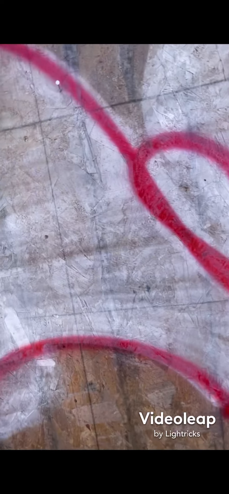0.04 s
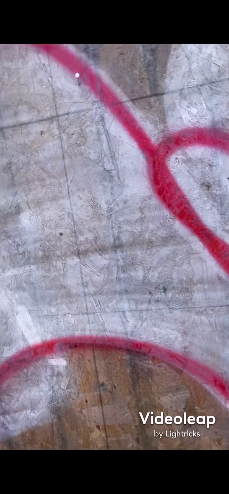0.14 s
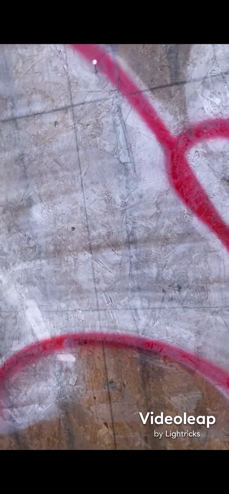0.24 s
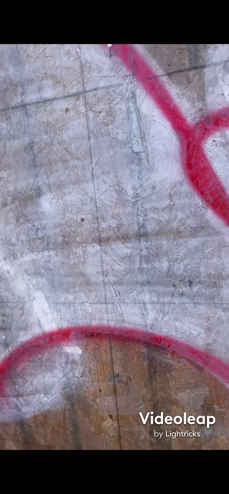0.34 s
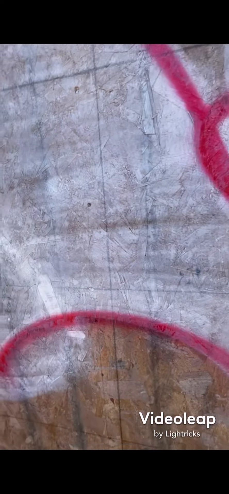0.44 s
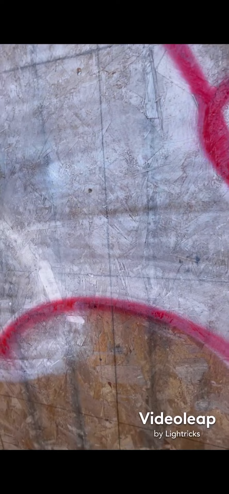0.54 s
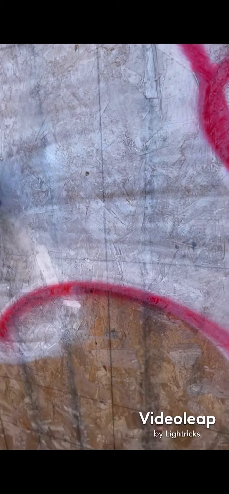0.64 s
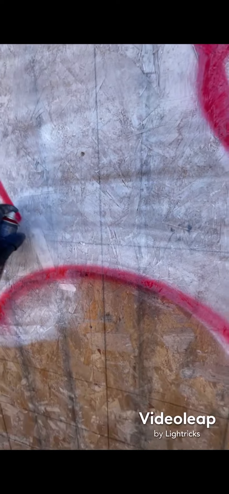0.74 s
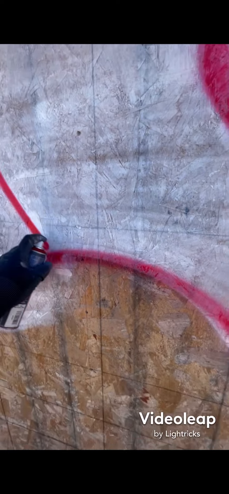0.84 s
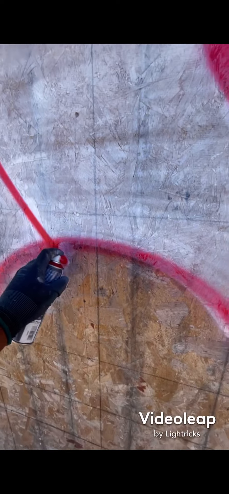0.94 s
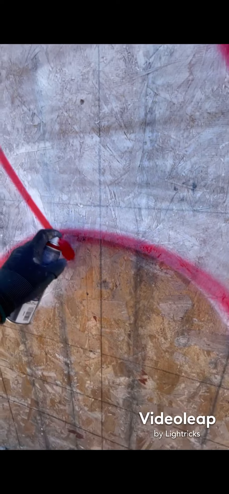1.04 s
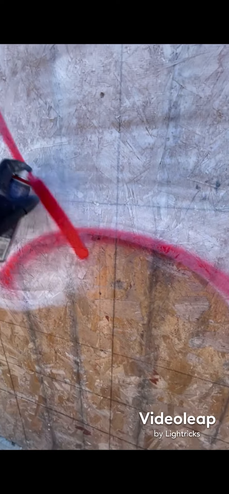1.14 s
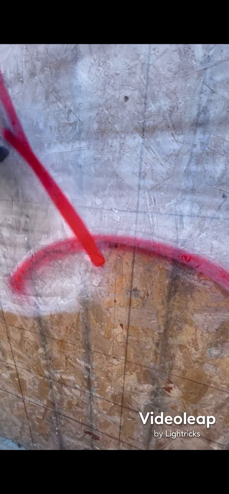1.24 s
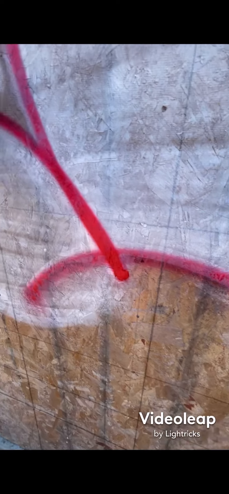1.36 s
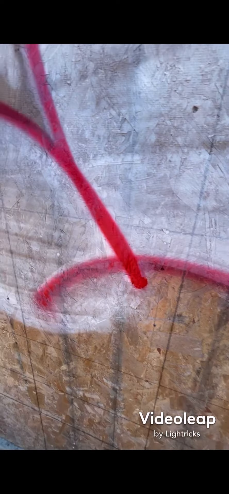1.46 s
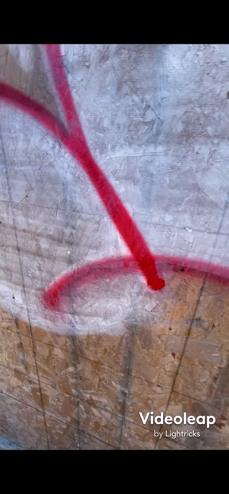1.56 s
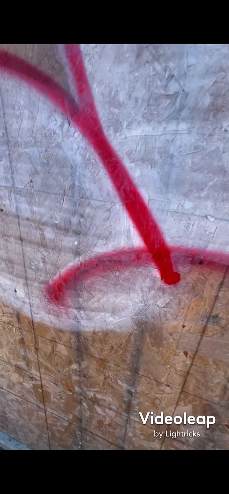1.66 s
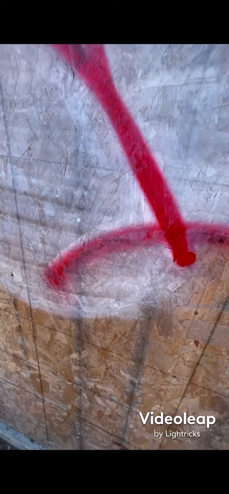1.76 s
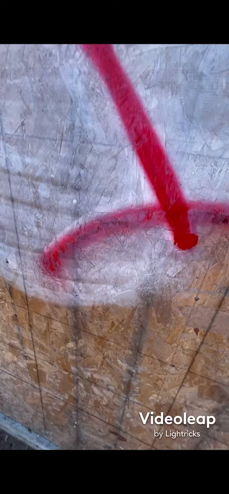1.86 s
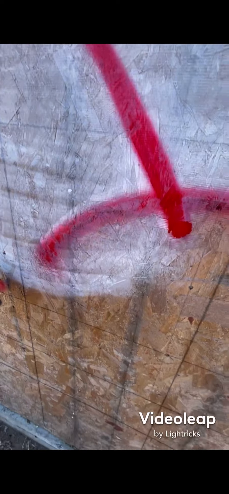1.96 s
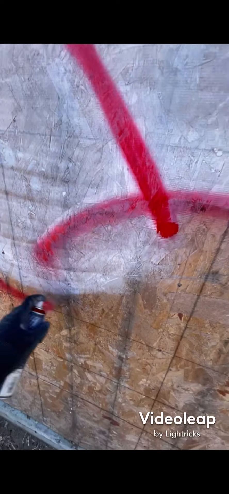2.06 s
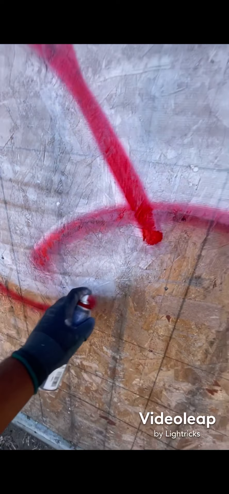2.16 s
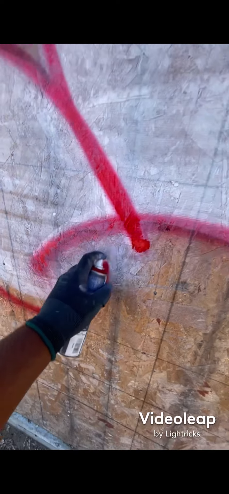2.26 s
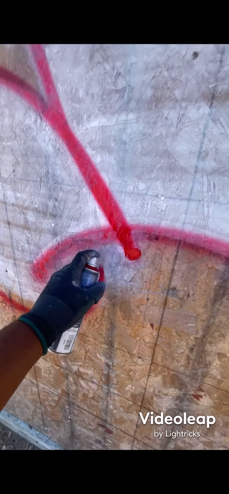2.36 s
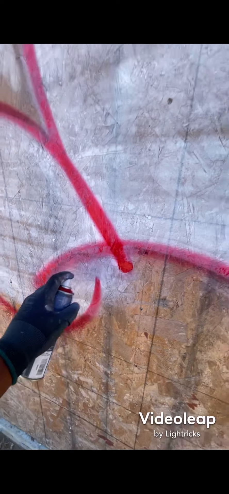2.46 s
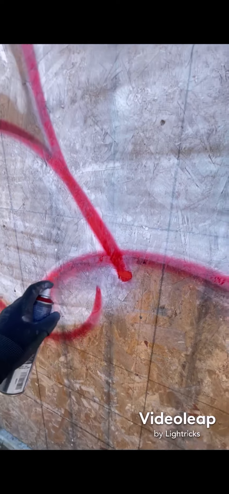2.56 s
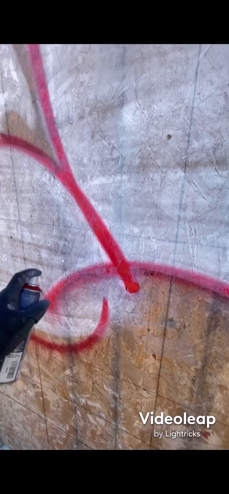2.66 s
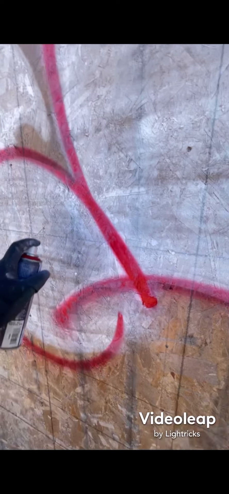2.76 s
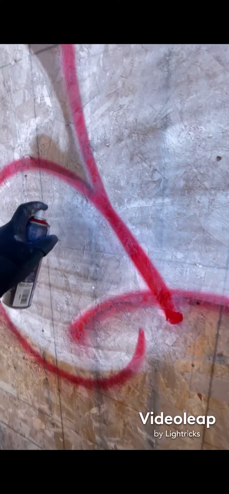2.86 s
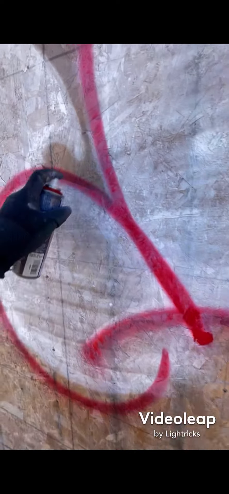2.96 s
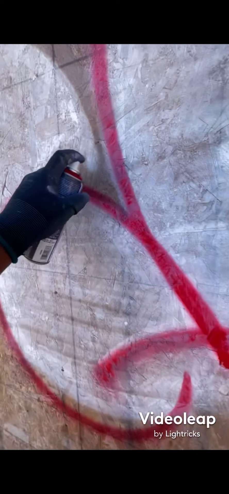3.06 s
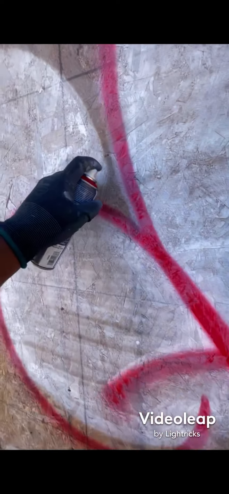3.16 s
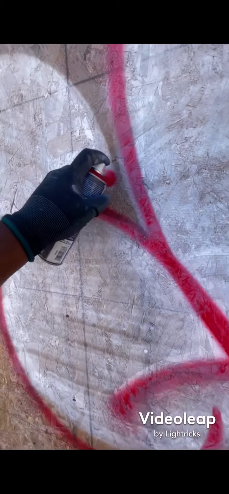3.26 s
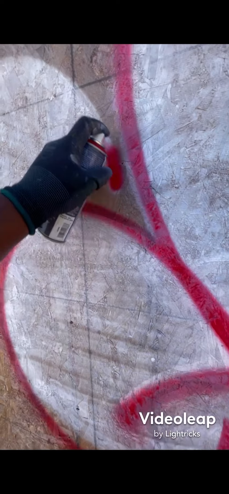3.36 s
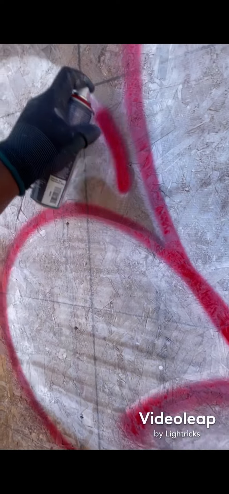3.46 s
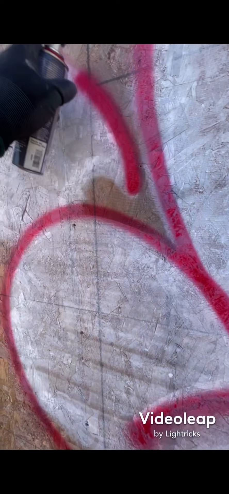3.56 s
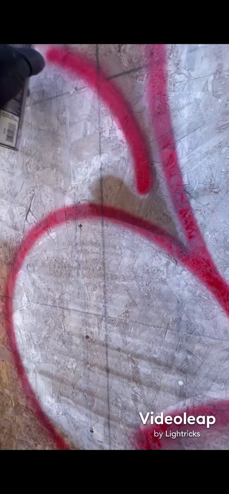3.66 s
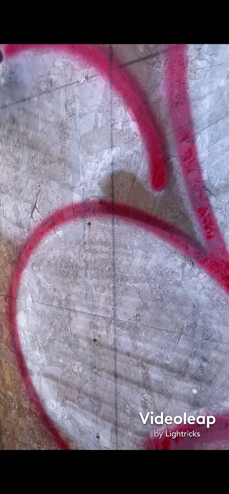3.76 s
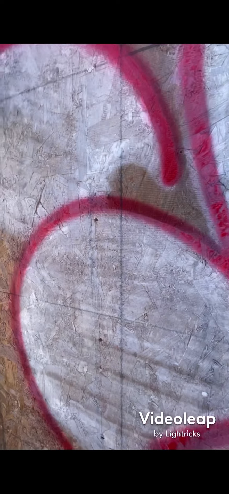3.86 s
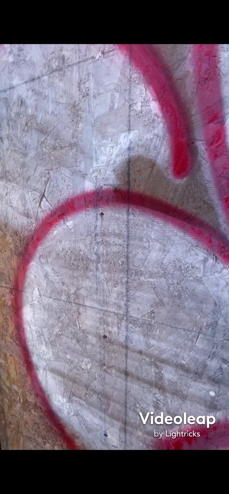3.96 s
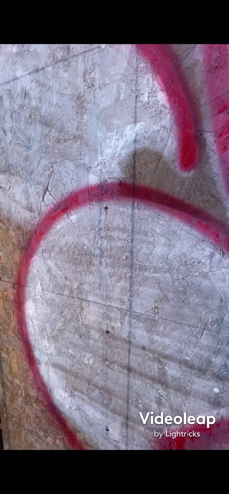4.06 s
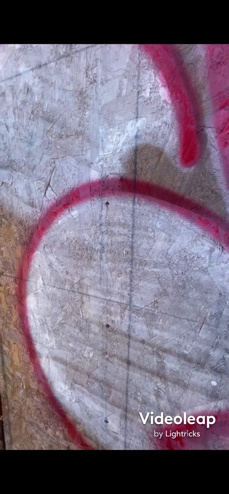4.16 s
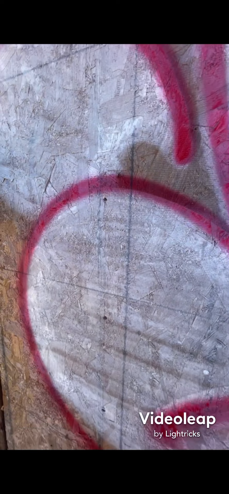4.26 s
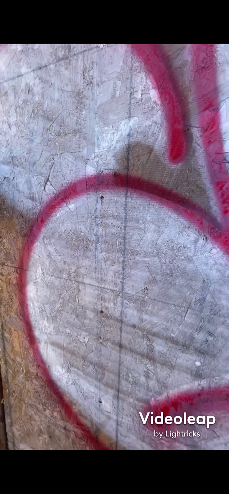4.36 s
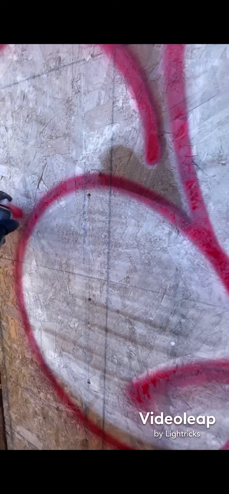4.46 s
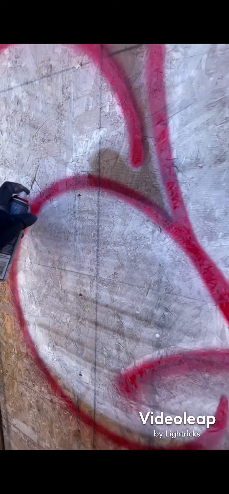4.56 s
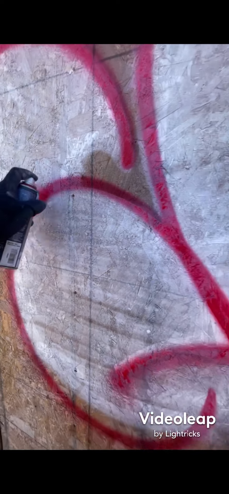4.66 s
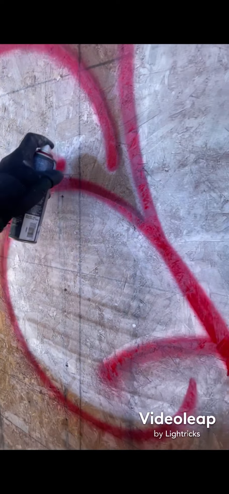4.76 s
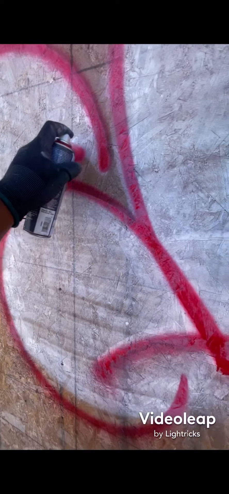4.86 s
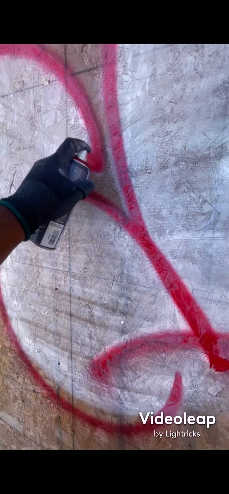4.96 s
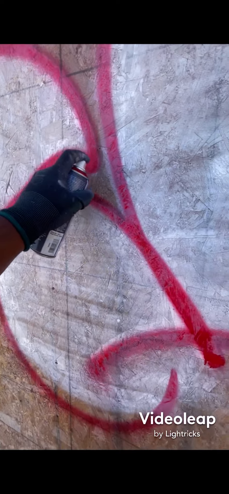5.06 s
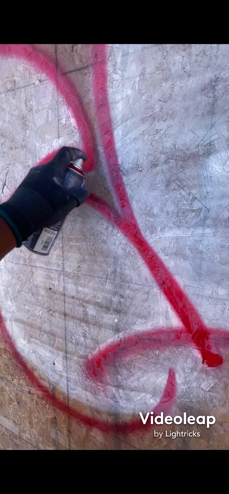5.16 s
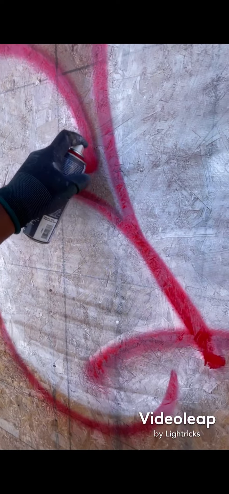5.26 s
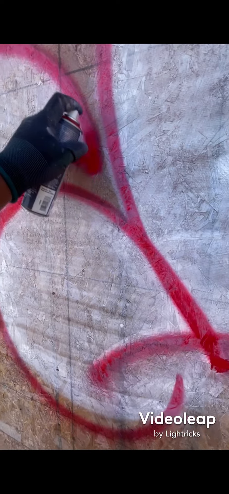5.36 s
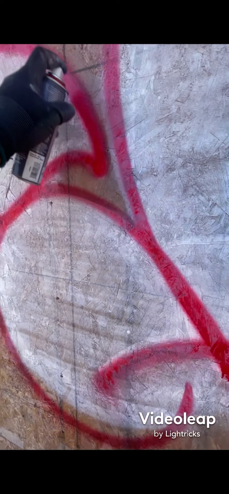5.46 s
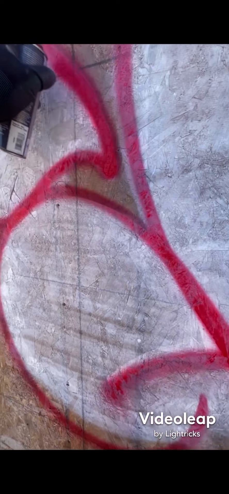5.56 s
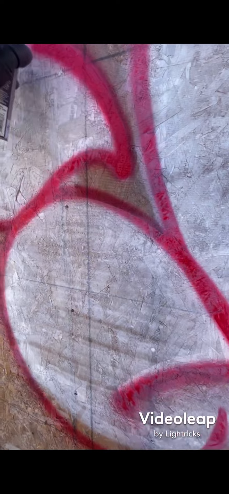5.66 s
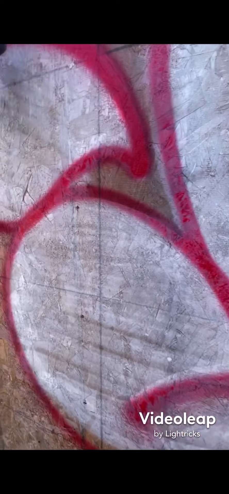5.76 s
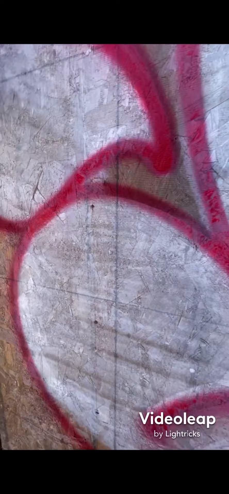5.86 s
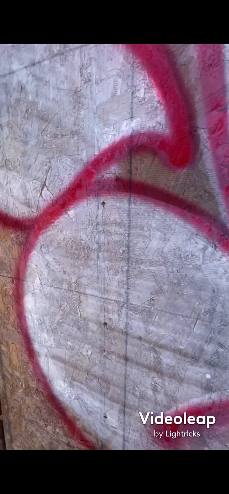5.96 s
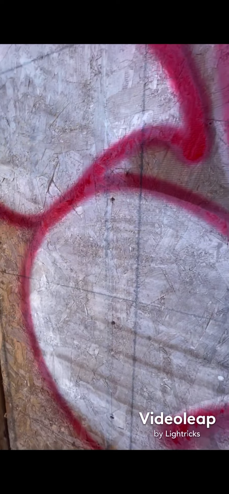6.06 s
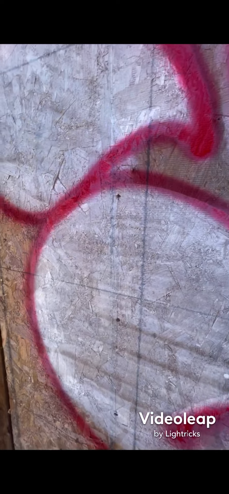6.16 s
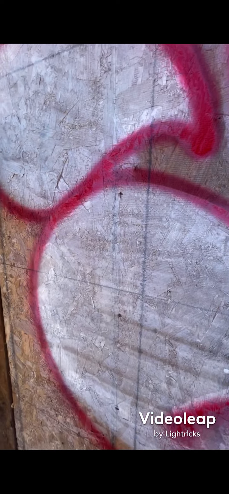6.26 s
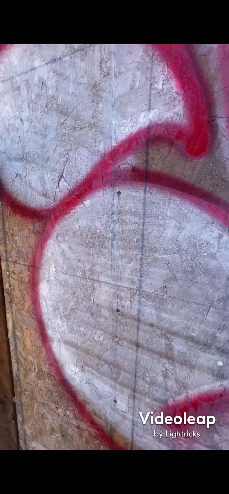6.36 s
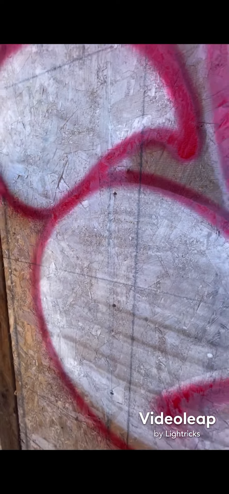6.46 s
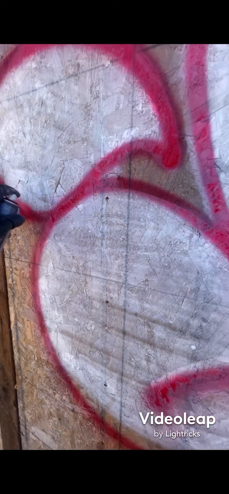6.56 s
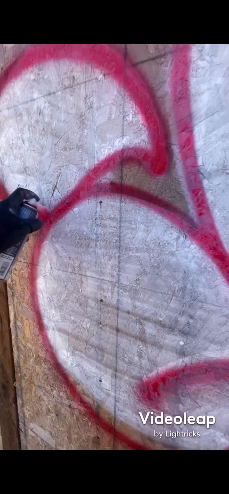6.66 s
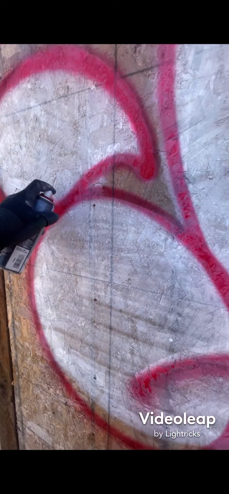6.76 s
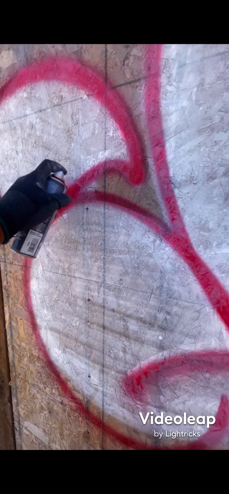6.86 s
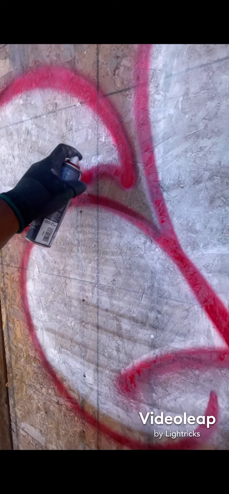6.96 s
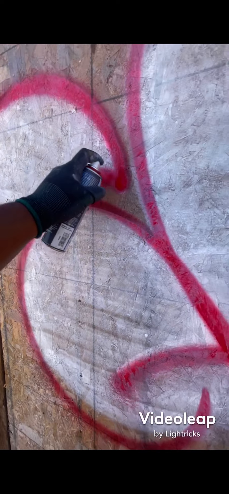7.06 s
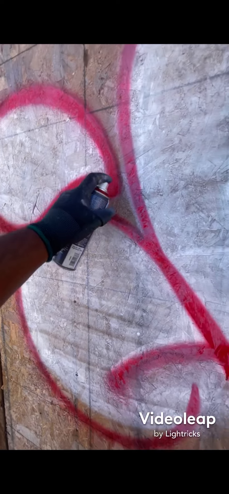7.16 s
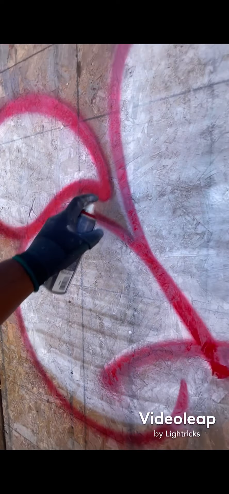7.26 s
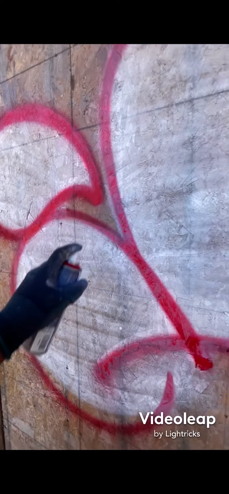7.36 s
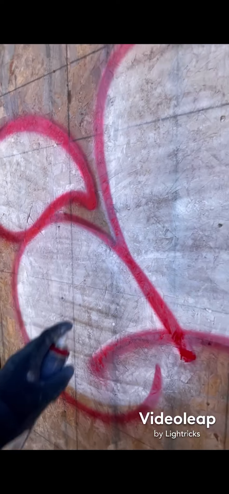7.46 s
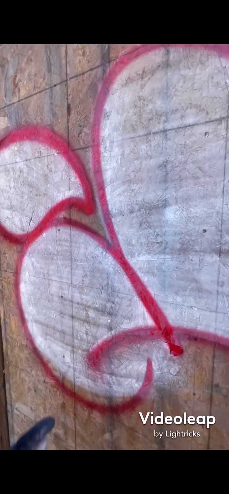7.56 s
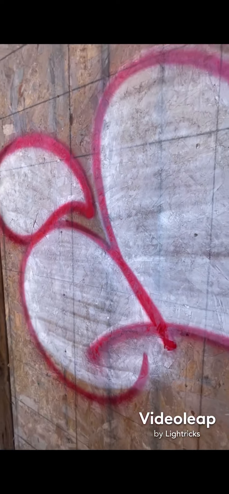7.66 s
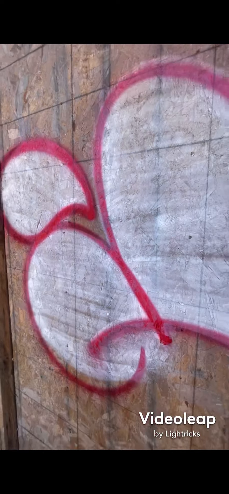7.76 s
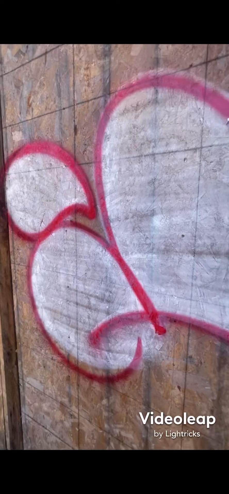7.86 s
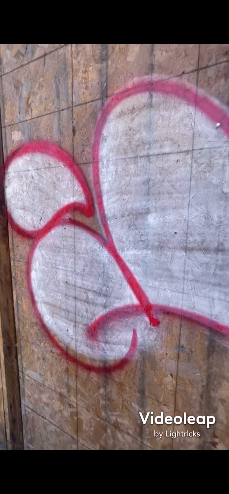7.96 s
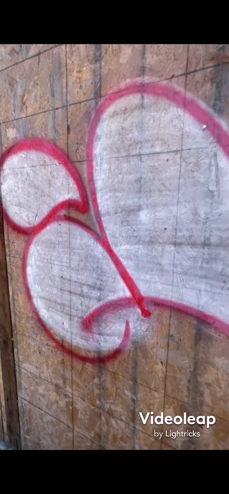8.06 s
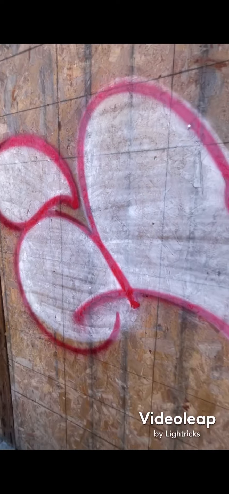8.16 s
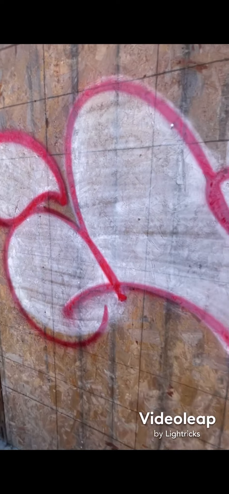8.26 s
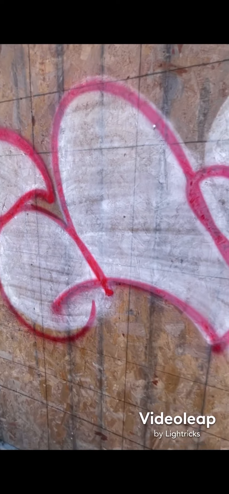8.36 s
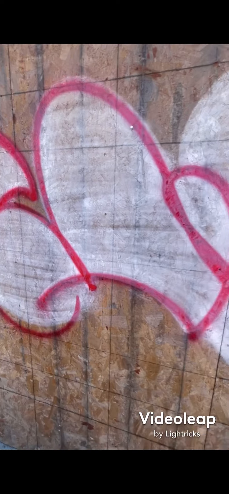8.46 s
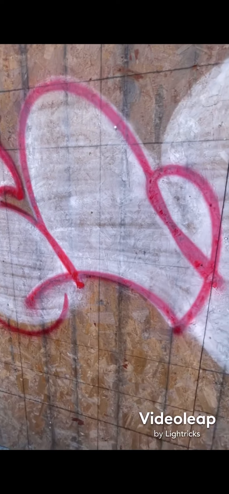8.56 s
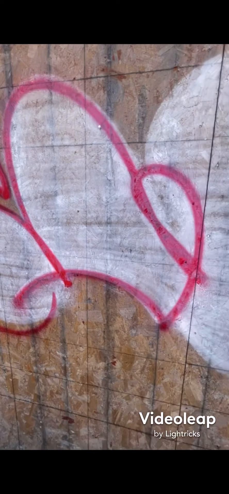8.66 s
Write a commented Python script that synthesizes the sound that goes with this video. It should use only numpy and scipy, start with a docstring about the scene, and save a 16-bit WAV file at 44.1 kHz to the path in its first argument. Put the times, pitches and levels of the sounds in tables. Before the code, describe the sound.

Three sharp, shifting aerosol hisses against wood, broken by can ticks and handling, end in glove rustle, low thumps and a faint draught.

```python
"""An aerosol can sprays three strokes on a wooden board outdoors, close to a phone with two microphone ports.
Its jet is turbulent noise, coloured by the aim and by echoes; short noise puffs are paint spattering on wood.
Between and after the strokes the can ticks (struck resonances) and knocks (damped sines) in a gloved hand,
clothes rustle (grainy noise) and low thumps sound at the phone (low sagging cycles). Shaped noise makes the low
outdoor rumble and the draught at the ports."""
import sys
import numpy as np
from scipy import signal
from scipy.fft import rfft, irfft, next_fast_len
from scipy.io import wavfile

SR = 44100
rng = np.random.default_rng(int(sys.argv[2]) if len(sys.argv) > 2 else 0)


def to_wav(sig):
    """Store sig (one row per channel, or 1-D mono) as 16-bit WAV at the path in sys.argv[1].

    Samples outside -1..1 are clipped; the rate is SR.
    """
    pcm = np.clip(np.atleast_2d(sig), -1, 1) * 32767
    pcm = np.round(pcm).astype(np.int16)
    wavfile.write(sys.argv[1], SR, pcm.T)  # frames by channels


N = 384111
T = np.arange(N) / SR  # time in seconds
SIZE = next_fast_len(N, real=True)
HZ = np.fft.rfftfreq(SIZE, 1 / SR)
FRAME = 512  # samples per short-time spectrum


def undb(db):
    """Logarithmic level: decibels to amplitude gain."""
    return np.exp(np.asarray(db) * (np.log(10) / 20))


def columns(table, at):
    """Linear interpolation: every further column of a table, read along its first."""
    first, *rest = np.transpose(table)
    return [np.interp(at, first, column) for column in rest]


def colour(points, hz=HZ):
    """Spectral envelope: gain from (hz, db) points joined along logarithmic frequency."""
    at, db = np.transpose(points)
    return undb(np.interp(np.log(hz + 1), np.log(at), db))


def bell(x, centre, width):
    """Gaussian curve of height 1; width is its standard deviation."""
    return np.exp(-.5 * ((x - centre) / width) ** 2)


def near(s):
    """Time window: the samples within a tenth of a second of a moment."""
    return slice(int(s * SR) - SR // 10, int(s * SR) + SR // 10)


def white():
    """Uncorrelated noise: two flat-spectrum signals."""
    return rng.standard_normal((2, N), dtype=np.float32)


def filtered(x, gain):
    """Linear filtering: multiply the spectrum by a gain per frequency."""
    spectrum = rfft(x.astype(np.float32), SIZE)
    return irfft(spectrum * np.asarray(gain, np.complex64), SIZE)[..., :N]


def shape(x, gain):
    """Power normalization: filter, keeping the power of white noise."""
    return filtered(x, gain / np.sqrt(np.mean(abs(gain) ** 2)))


def resonances(table):
    """Modal superposition: summed response of (hz, width_hz, db) resonances."""
    response = 0
    for hz, width, db in table:
        response = response + undb(db) / (1 + 1j * (HZ ** 2 - hz ** 2) / (width * (HZ + 1)))
    return response


def walk(rate, at=T):
    """Random modulation of spread near 1, taking a new value rate times a second."""
    steps = rng.standard_normal(N // 40)
    return 1.203 * np.interp(at * rate, np.arange(len(steps)), steps)


# nozzle presses: crack_s (valve cracks), full_s (press ends), lift_s (finger lifts), shut_s
STROKES = [(-.1, -.05, 2.095, 2.148), (3.058, 3.104, 4.808, 4.868), (5.06, 5.096, 6.956, 7.004)]
# the valve leaks a little before it opens: opening_share (0-1 of crack to full), flow (0-1)
STEM_FLOW = [(0, 0.05), (.15, 0), (.35, 0.19), (.7, .24), (1, 0.93)]


def valve(taper=1.54):
    """Flow control: a leak, then the jet, pinched off as the stem comes up."""
    flow = 0
    for crack, full, lift, shut in STROKES:
        press, = columns(STEM_FLOW, (T - crack) / (full - crack))
        release = np.clip((shut - T) / (shut - lift), 0, 1) ** taper
        flow = flow + press * (T > crack) * release
    return flow


# hiss before aim and echo: frequency_hz, level_db_per_hz
JET_SPECTRUM = [(200, -81), (450, -70), (750, -76), (1200, -77), (2300, -78), (3000, -78), (3900, -86.5),
                (4900, -84), (6300, -77.5), (7800, -73.5), (9300, -70), (10700, -63), (11700, -58),
                (12500, -66), (13500, -73.5), (14300, -81), (15700, -94)]
# the jet as the hand draws each line: time_s, beam_db (in full from 11 kHz up), drumming_db (of the board),
# fan_db (of the spray), upper_db (level of the hiss near 9.3 kHz), dip_hz (between the beam's lobes)
AIM = [(0.02, 4, -13, -1.5, 0.5, 8000), (0.25, -2, -3, 5, 2, 10130), (0.45, 4.5, -1, -2.5, 8.5, 6630),
       (0.6, 4, 9, 3.5, -0.5, 7860), (0.8, 4.5, 10, -4, -2, 8180), (0.98, -9.5, 4, 10.5, 12, 10700),
       (1.1, -5, 0, 6, 12.5, 10840), (1.34, -2.5, -0.5, 6.5, 0, 10700), (1.52, -8, 4.5, 5.5, 12, 10500),
       (1.68, 5.5, 4, -4.5, -1.5, 7600), (1.82, -5.5, 8.5, -4, 6.5, 8510), (2.07, 5, 11, -3, -0.5, 8180),
       (3.12, 5, 1, 1, -7, 10800), (3.28, 4.5, -3.5, 4.5, 0, 9400), (3.48, 1, -6, 3, 10.5, 7380),
       (3.68, 3, -8, 0, 1, 8930), (3.85, -0.5, -6, 0, -18.5, 9940), (4.05, 1.5, -5, 1.5, -15, 12100),
       (4.22, -2, 1.5, 8, -27, 12300), (4.43, 1, 2, 11.5, -27.5, 13930), (4.56, 2, -4.5, 1.5, -3, 8470),
       (4.68, 3.5, -6.5, 3, 7, 7570), (4.8, 4.5, -4.5, 1, -1, 8200), (5.1, 4, -5, 2, 2.5, 8700),
       (5.28, 4.5, -5.5, 3.5, 4, 8370), (5.43, 4, -5, 2.5, -7, 9240), (5.58, 4, -8.5, 0.5, -0.5, 8060),
       (5.77, 1, -6, 1, -4, 9230), (6.0, -0.5, -8, 0, 5.5, 8480), (6.23, 0, -4, 4, 4, 8520),
       (6.45, -1.5, 0, 9, 2, 9500), (6.62, 0, 2, 7, -7.5, 10860), (6.76, 2.5, -5.5, 4.5, 8.5, 7200),
       (6.94, 2.5, -4.5, 3, 4.0, 8080)]
# bands that follow drumming_db, fan_db and upper_db, in that order: centre_hz, width_hz
AIM_BANDS = [(2070, 910), (5500, 1250), (9300, 970)]
# lobes of the beam, which slide together as the can turns: frequency_ratio (to dip_hz), level_db
BEAM_LOBES = [(0.2, -6), (0.29, -2.5), (0.36, 1.5), (0.43, 3.5), (0.51, 4), (0.59, 8.5), (0.68, 7),
              (0.78, 5), (0.89, -2), (1.0, -2), (1.12, 0.8), (1.25, 2.3), (1.45, -5), (1.7, -5.5)]
# the nozzle passes close, a hollow note swells between can and board: peak_s, swell_db, spread_s, pitch_hz
PASSES = [(0.039, 7.5, 0.068, 2580), (1.121, 12.5, 0.092, 3200), (2, 5, 0.13, 4250), (3.403, 9, 0.28, 2950),
          (4.68, 5.5, 0.064, 2730), (5.362, 8.8, 0.16, 2990), (5.806, 5, 0.16, 3080),
          (6.4, 1.5, 0.45, 4630), (6.859, 3, 0.085, 2765)]
# topmost treble of the hiss: time_s, level_db
AIR = [(.1, 3.5), (.4, 7), (.8, 3.5), (1.0, 21), (1.3, 11), (1.55, 9.5), (1.8, -6), (3.15, 4.5),
       (3.5, 15.5), (3.8, -26.5), (4.2, -17.5), (4.75, 8), (5.3, 2), (5.75, -16.5), (6.0, 8), (6.5, -1.5),
       (6.85, 12)]
AIR_HZ, AIR_WIDTH_HZ = 14800, 800
# band cancelled or reinforced by the board's echo as the can travels: time_s, centre_hz, level_db
ECHO_BAND = [(.15, 3230, 7.5), (.5, 3030, -5.5), (.9, 2700, -1), (1.2, 2630, 1), (1.45, 3540, -3),
             (2.05, 3040, -2.5), (3.2, 3960, 1.5), (3.8, 4530, -6), (4.1, 3440, -3.5), (4.35, 3480, -5),
             (4.8, 3350, 2), (5.2, 4280, -1.5), (5.9, 4600, -7.5), (6.15, 3410, -4.5), (6.55, 3500, -8.5),
             (6.95, 3130, 0.5)]
BOARD_ECHO, ARM_ECHO = .26, .45  # depth of each comb


def echo_comb(hz, t, gap_s=0.000891, arm_gap_s=.0034, sway=0.208, bend_hz=700, scatter_hz=7500):
    """Comb interference: delayed echoes alternately reinforce and cancel the direct hiss along frequency."""
    # the gap to the board sways with the hand, so the comb glides
    board_delay_s = gap_s * np.exp(sway * walk(3, t))
    # the longer way round the arm adds a finer comb
    arm_delay_s = arm_gap_s * np.exp(sway * walk(1.4, t))
    ripple = BOARD_ECHO * np.cos(2 * np.pi * hz * board_delay_s)
    ripple = ripple + ARM_ECHO * np.cos(2 * np.pi * hz * arm_delay_s)
    # the lows bend round the arm; rough wood scatters the highest part instead of mirroring it
    return 1 + ripple * hz / (hz + bend_hz) / (1 + (hz / scatter_hz) ** 4)


def jet(gain_db=0.07, hollow_width_hz=265, echo_width_hz=260, flutter_db=0.78):
    """Turbulence and directivity: broadband hiss whose colour follows the aim."""
    hz, t, noise = signal.stft(white(), SR, nperseg=FRAME)
    hz = hz[:, None]
    beam_db, *bands_db, dip_hz = columns(AIM, t)
    db = gain_db + beam_db * np.minimum(hz / 11000, 1)
    db = db + columns(BEAM_LOBES, hz / dip_hz)[0]
    for (centre, width), band_db in zip(AIM_BANDS, bands_db):
        db = db + band_db * bell(hz, centre, width)
    for s, swell_db, spread, hollow_hz in PASSES:
        db = db + swell_db * bell(t, s, spread) * bell(hz, hollow_hz, hollow_width_hz)
    db = db + columns(AIR, t)[0] * bell(hz, AIR_HZ, AIR_WIDTH_HZ)
    echo_hz, echo_db = columns(ECHO_BAND, t)
    db = db + echo_db * bell(hz, echo_hz, echo_width_hz)
    spectra = noise * colour(JET_SPECTRUM, hz) * undb(db) * echo_comb(hz, t)
    hiss = signal.istft(spectra, SR, nperseg=FRAME)[1][:, :N]
    # sqrt(SR / 2) turns level per Hz into sample amplitude
    return hiss * np.sqrt(SR / 2) * valve() * undb(flutter_db * walk(50))


# the board's echo sets the ports against each other in a moving band: time_s, centre_hz, lag_rad
OPPOSED_BAND = [(0, 3220, 2.3), (.35, 2940, 2.8), (.7, 3060, 0.19), (1.1, 2950, 1.7), (1.45, 3480, 3.9),
                (1.8, 3600, .3), (3.1, 2570, 1.4), (3.6, 2650, 1.76), (4.2, 3260, 2.2), (4.8, 2895, 2.1),
                (5.2, 2660, 1.9), (5.9, 2840, 2.1), (6.5, 3070, 4.6), (6.95, 2880, 1.3)]


def opposed(pair, width_hz=260):
    """Phase opposition: an uneven echo turns one gliding band out of step between the ports."""
    hz, t, spectra = signal.stft(pair, SR, nperseg=FRAME)
    centre, lag = columns(OPPOSED_BAND, t)
    turn = np.exp(.5j * lag * bell(hz[:, None], centre, width_hz))
    turned = spectra * np.array([turn, turn.conj()])
    return signal.istft(turned, SR, nperseg=FRAME)[1][:, :N]


# right port against left: frequency_hz, lag_rad, likeness (0-1), left_minus_right_db
PORTS = [(0, -1.5, 1, 0.5), (430, -0.12, 1, 1), (790, 3, 0.39, 7.5), (1295, 5.5, 0.82, -7),
         (1860, 6, 1, 1.5), (2210, 6, 1, -1), (2840, 7, 0.52, 1.5), (4190, 6.5, 0.59, 1),
         (5080, 10.5, 0.7, -3.5), (5500, 11.5, 0.17, 5.5), (6470, 12.5, 1, -2.5), (7330, 14, 0.05, -0.5),
         (8810, 16.5, 1, 1.5), (9620, 16.5, 0.86, -4), (9870, 15.5, 1, 3.5), (11816, 17.5, 0.95, -1),
         (12800, 19.5, 1, 0)]


def ports(sound, scatter=0, scatter_hz=1400):
    """Spatial coherence: the ports share part of a sound, with a lag and balance that vary with frequency."""
    lag, likeness, balance_db = columns(PORTS, HZ)
    # scattered treble is less alike at the two ports
    direct = 1 - np.clip(scatter, 0, 1) * HZ ** 2 / (HZ ** 2 + scatter_hz ** 2)
    likeness = np.clip(likeness, 0, 1) * direct
    side = np.array([[1], [-1]])
    gain = undb(side * balance_db * direct / 2)
    port = np.exp(.5j * side * lag) * gain / np.sqrt(np.mean(gain ** 2, axis=0))
    shared, apart = sound
    in_common = filtered(shared, port * np.sqrt((1 + likeness) / 2))
    difference = filtered(apart, port * side * np.sqrt((1 - likeness) / 2))
    return in_common + difference


# outdoor background: frequency_hz, level_db_per_hz
OUTDOORS = [(22, -110), (36, -81), (55, -71), (85, -69), (120, -74), (200, -86.5), (450, -102), (800, -100),
            (2000, -117), (6000, -120), (12000, -122), (15000, -135)]


def outdoors(swell_db=1):
    """Ambient noise: a low, heaving rumble of the surroundings."""
    return filtered(white(), colour(OUTDOORS)) * np.sqrt(SR / 2) * undb(swell_db * walk(7.4))


# colour of the gusts: frequency_hz, relative_db
EDDIES = [(20, -42.5), (37, -6), (60, -1), (100, -9), (170, -19), (320, -16), (500, -22), (1500, -52.5)]
DRAUGHT_DB, SWING_DB = -62.5, -56  # before and after the phone swings back
SWING_S, SWING_RISE_S = 7.6, 0.79


def draught(gust_db=3.1):
    """Flow noise: soft gusts, uncorrelated left and right, that rise as the phone swings back."""
    swing = np.clip((T - SWING_S) / SWING_RISE_S, 0, 1)
    level_db = DRAUGHT_DB + swing * (SWING_DB - DRAUGHT_DB)
    return shape(white(), colour(EDDIES)) * undb(level_db + gust_db * walk(24))


RUB_RELEASE_RATIO = 1.4  # decay spread over build-up spread


def rub(s, spread):
    """Asymmetric envelope: a slide of cloth or glove builds up and dies away more slowly."""
    return bell(T, s, np.where(T < s, spread, spread * RUB_RELEASE_RATIO))


# glove and sleeve rub as the arm moves: peak_s, spread_s, level_db (before gain_db),
# dullness_db (lows against highs)
RUBS = [(2.283, 0.043, -56, 1.5), (2.434, 0.031, -64.5, 6.5), (2.517, 0.017, -63.5, 4),
        (2.63, 0.014, -54.5, 4.5), (2.689, 0.018, -58.5, 4), (2.862, 0.0065, -48, -1),
        (2.877, 0.065, -66.5, 3), (2.962, 0.0053, -51, -2.5), (3.001, 0.026, -63.5, 1),
        (4.878, 0.016, -64, -23), (7.07, 0.1, -60.5, 4.5), (7.247, 0.0077, -65, 12),
        (7.39, 0.017, -61.5, 2.5), (7.432, 0.0082, -43.5, -7.5), (7.47, .03, -70, 0),
        (7.611, 0.09, -74.5, 11.5), (7.882, 0.034, -64, 12), (7.977, 0.028, -70, 18),
        (8.085, 0.029, -62, 7), (8.185, 0.027, -57.5, -2.5), (8.302, 0.037, -68, 5.5),
        (8.6, 0.016, -61.5, 12.5), (8.677, 0.022, -65.5, 10)]
# colour of cloth and rubber: frequency_hz, relative_db
CLOTH = [(150, -12.5), (300, 7.5), (500, 6), (1000, 2), (2200, 3.5), (4000, 3.5), (6300, 2), (9000, -2),
         (11700, -0.5), (12800, -24), (15000, -33)]
IDLE_DB, IDLE_DULL_DB = -79.5, -1  # the sleeve of an arm held still, before gain_db


def rustle(gain_db=-4, grain_db=2.0, catch_db=2.0, snags_per_s=110, snag_db=10):
    """Stick-slip friction: cloth and rubber slide in small catches and snags; each rub has its own dullness."""
    high_level, low_level = undb(IDLE_DB), undb(IDLE_DB + IDLE_DULL_DB)
    for s, spread, db, dull_db in RUBS:
        slide = undb(db) * rub(s, spread)
        high_level = high_level + slide
        low_level = low_level + undb(dull_db) * slide
    snags = (rng.random(N) < snags_per_s / SR) * rng.exponential(size=N)
    fibres = shape(white() * (1 + undb(snag_db) * snags), colour(CLOTH))
    low = filtered(fibres, 1 / (1 + (HZ / 3200) ** 4))
    high = fibres - low
    catches = undb(gain_db + grain_db * walk(620) + catch_db * walk(60))
    return (high_level * high + low_level * low) * catches


# ticks of the can and its cap: start_s, level_db (before trim_db), low_knock_db (weight of the lows)
TICKS = [(2.1375, -33.5, 8.5), (2.15, -30, 0.5), (2.2036, -38.5, 10.5), (2.21, -20.5, 0),
         (2.2185, -38.5, -4), (2.2322, -25.5, -6), (2.2402, -39, -8), (2.2452, -40, -8),
         (2.2556, -36.5, -13), (2.2602, -33.5, -5), (2.2676, -19.5, -14), (2.2825, -34.5, -12),
         (2.2972, -28.5, -12), (2.3146, -27.5, -18.5), (2.3674, -48, -1), (2.391, -44.5, -1),
         (2.4242, -49, 2), (2.436, -49, 8.5), (2.4918, -36.5, -9), (2.519, -55, -8), (2.5862, -49, -4.5),
         (2.6395, -42, -2.5), (2.6658, -37.5, 3), (2.6765, -40.5, -2), (2.691, -44, 3), (2.8405, -47, 5),
         (2.862, -37, -0.5), (2.9482, -54, -3), (2.9625, -40.5, -4.5), (4.947, -64, -15),
         (7.2485, -47.5, 13), (7.394, -45.5, -8), (7.4282, -32.5, -13), (7.438, -37.5, -10.5),
         (7.8966, -31.5, 0), (8.0954, -32, 7), (8.144, -37.5, -4.5), (8.344, -48.5, -5.5),
         (8.599, -49, 7.5), (8.612, -49, 6), (8.645, -52, 0.5)]
# what the can rings with: pitch_hz, width_hz, level_db
CAN_MODES = [(883, 120, 1.5), (1190, 240, -2.5), (1840, 240, -2), (3040, 280, -2.5), (4670, 330, -5.5),
             (6170, 430, -1.5), (9670, 330, 0), (11650, 900, 4)]
# the stem clicks as the valve cracks
STEM_CLICK_DB, STEM_KNOCK_DB, STEM_CLICK_S = -42, -14, 0.0043


def contacts():
    """Impact sequence: the ticks, and the click of each press that begins within the scene."""
    clicks = []
    for crack, *_ in STROKES:
        if crack > 0:
            clicks.append((crack + STEM_CLICK_S, STEM_CLICK_DB, STEM_KNOCK_DB))
    return [*TICKS, *clicks]


def ticks(tail_s=0.01, tail_db=-26, dry_db=-15, trim_db=-5.5, soft_hz=12400):
    """Impact excitation: a hard strike and brief scrape ring the can, with a faint tail off the board."""
    ring = undb(dry_db) + resonances(CAN_MODES)
    force, low_force = np.zeros((2, 2, N))
    age = T[:SR // 30]
    contact_s, strike = .0011, 3.6
    fade = np.exp(-age / contact_s) + undb(tail_db) * np.exp(-age / tail_s)
    for s, db, low_db in contacts():
        span = slice(int(s * SR), int(s * SR) + len(age))
        push = fade * rng.standard_normal((2, len(age)))
        push[0, 0] += strike
        force[:, span] += undb(db) * push
        low_force[:, span] += undb(db + low_db) * push
    low = 1 / (1 + (HZ / 1500) ** 4)
    contact = filtered(force, 1 - low) + filtered(low_force, low)
    return undb(trim_db) * shape(contact, ring / (1 + (HZ / soft_hz) ** 30))


# low thumps at the phone: peak_s, level_db, pitch_hz (at the peak), spread_s, scuff_db, left_minus_right_db
BUMPS = [(2.154, -22.5, 162, 0.0092, -13, 1.5), (2.187, -35.5, 135, 0.0053, -13, 2),
         (7.02, -39.5, 70, 0.009, -15, 6), (7.279, -34, 80, 0.0048, -20, 7),
         (7.455, -49, 90, .007, -27, 14), (7.503, -39.5, 81, 0.0055, -35, 8),
         (7.57, -35, 62, 0.0076, -25.5, 8), (7.746, -41, 64, 0.0062, -30, 6),
         (7.798, -38, 48.6, 0.015, -27, 5), (7.897, -36.5, 75, 0.0063, -38, 2)]
# colour of the scuff: frequency_hz, relative_db
SCUFF = [(100, -2), (250, 1), (430, -2.5), (600, -4), (800, -15), (2000, -24), (6000, -33.5)]
BUMP_RELEASE_RATIO = 1.36  # decay spread over build-up spread
BUMP_SAG = .1  # share of the pitch lost per spread_s


def bumps(scuff_lead_s=0.0014):
    """Low-frequency transients: thumps of low sagging cycles, each with a brief scuff and louder at one port."""
    sound, skin = np.zeros((2, N)), shape(white()[0], colour(SCUFF))
    for s, db, hz, spread, scuff_db, pan_db in BUMPS:
        age = T[near(s)] - s
        release = spread * BUMP_RELEASE_RATIO
        swell = bell(age, 0, np.where(age < 0, spread, release))
        cycles = hz * age * (1 - BUMP_SAG * age / spread / 2)
        thud = swell * np.cos(2 * np.pi * cycles)
        scuff = undb(scuff_db) * bell(age, -scuff_lead_s, release) * skin[near(s)]
        port_gain = undb(db + np.array([[pan_db], [-pan_db]]) / 2)
        sound[:, near(s)] += port_gain * (thud + scuff)
    return sound


# hollow knocks of the can in the palm: start_s, level_db
KNOCKS = [(2.776, -58), (2.844, -43.5)]
KNOCK_HZ = 1054


def knocks(ring_s=0.0035):
    """Damped oscillation: the gloved palm stops a note of the can within a few cycles."""
    sound = np.zeros(N)
    for s, db in KNOCKS:
        age = np.maximum(T[near(s)] - s, 0)
        sound[near(s)] += undb(db) * np.exp(-age / ring_s) * np.sin(2 * np.pi * KNOCK_HZ * age)
    return sound


# the jet flutters on rough spots of the board: peak_s, level_db
SPATTERS = [(3.875, -47.5), (4.003, -43.5), (4.157, -39.5), (5.91, -46.5), (6.072, -42.5), (6.239, -39.5)]
# colour of the puffs: frequency_hz, relative_db
SPATTER_COLOUR = [(300, -3.5), (700, 2.5), (1100, 3), (1500, -5), (2200, -8), (4500, -5), (8000, -19.5)]
SPATTER_SPREAD_S = 0.02


def spatter():
    """Jet impingement: short noise puffs where the jet breaks up on the wood."""
    puffs = np.zeros(N)
    for s, db in SPATTERS:
        puffs[near(s)] += undb(db) * bell(T[near(s)], s, SPATTER_SPREAD_S)
    return shape(white(), colour(SPATTER_COLOUR)) * puffs


# hollow resonances under the sliding glove: pitch_hz, width_hz, level_db
GRIP_MODES = [(444, 130, 10.5), (860, 130, 3), (1740, 140, -8), (2660, 170, -1), (4850, 380, -2),
              (6750, 700, -6), (10900, 900, -3)]
GRIP_S, GRIP_SPREAD_S, GRIP_DB = 7.075, 0.072, -56


def grip(soft_hz=11800):
    """Frictional excitation: after the last stroke the glove slides over the can with a hollow brush."""
    brush = shape(white(), resonances(GRIP_MODES) / (1 + (HZ / soft_hz) ** 20))
    return brush * undb(GRIP_DB) * rub(GRIP_S, GRIP_SPREAD_S)


# the holding arm's sleeve slides past the phone as it draws back: time_s, level_db
SLEEVE = [(7.82, -92), (7.9, -73), (8.05, -62.5), (8.25, -64.5), (8.48, -69), (8.7, -63)]
# colour of the sleeve: frequency_hz, relative_db
SLEEVE_COLOUR = [(270, 7), (600, -3), (1400, 1.5), (4000, -4), (7000, -1.5), (9500, -5), (12000, 2),
                 (12900, -25), (15000, -46)]


def sleeve(grain_db=1.5):
    """Near-field friction: a fine, even brushing so close that each port hears its own."""
    level_db, = columns(SLEEVE, T)
    return shape(white(), colour(SLEEVE_COLOUR)) * undb(level_db + grain_db * walk(500))


HANDLING_SCATTER = 0.54  # share of treble arriving by way of board and body, in the high limit


def scene():
    """Superposition: most sounds pass through the port model; the others are already one or two port signals."""
    spray = opposed(ports(jet()))
    scattered = ports(outdoors() + rustle() + ticks() + spatter() + grip(), HANDLING_SCATTER)
    return spray + scattered + draught() + bumps() + knocks() + sleeve()


TOP_HZ = 15700


def record(dry):
    """Band limitation: the phone cuts the top with a steep elliptic low-pass filter."""
    low_pass = signal.ellip(10, .2, 80, TOP_HZ, fs=SR, output="sos")
    return signal.sosfilt(low_pass, dry)


dry = scene()
out = record(dry)
to_wav(out)
```